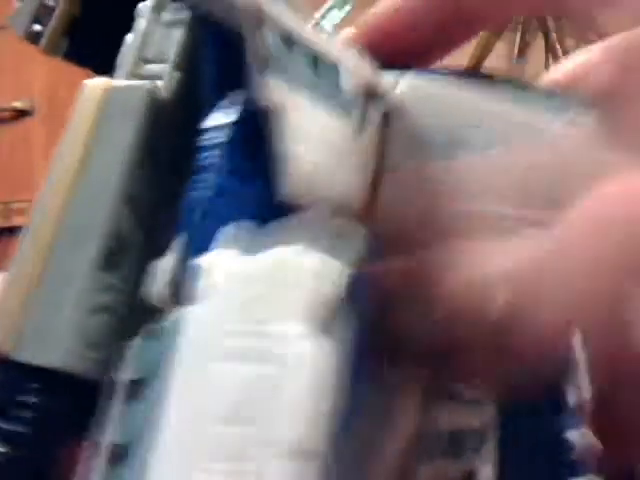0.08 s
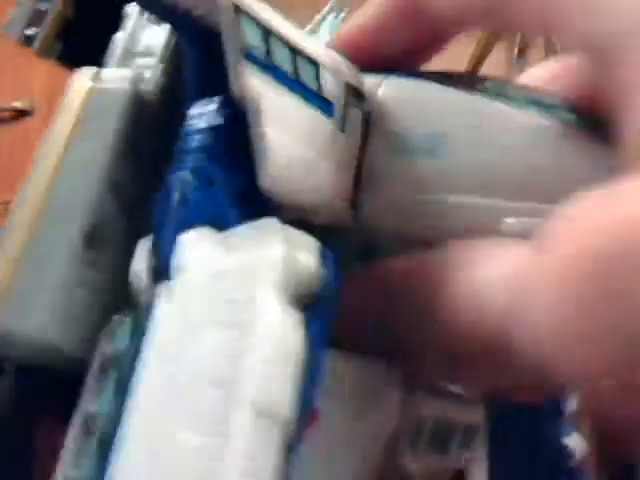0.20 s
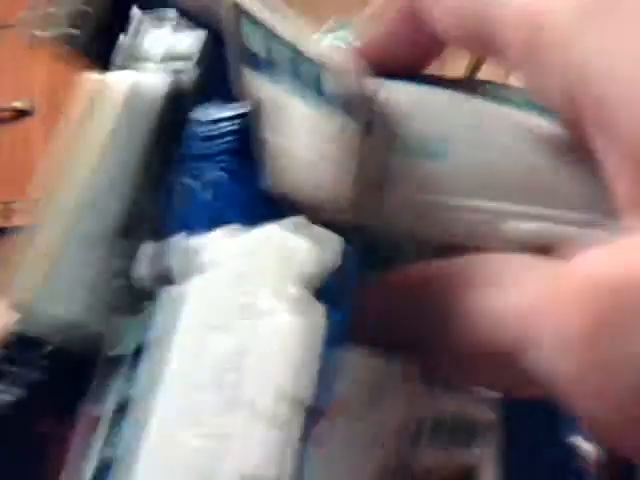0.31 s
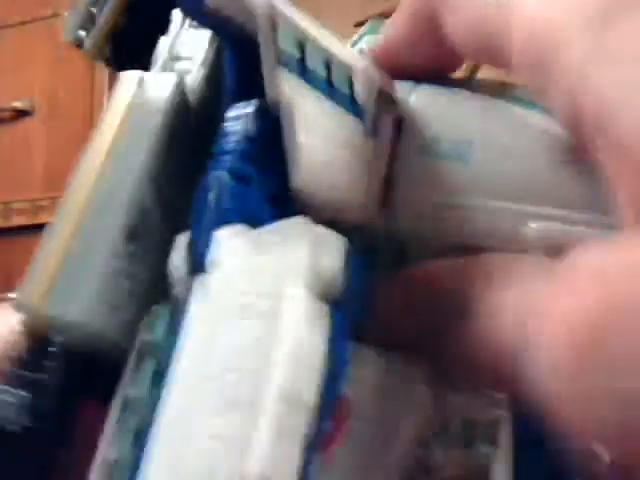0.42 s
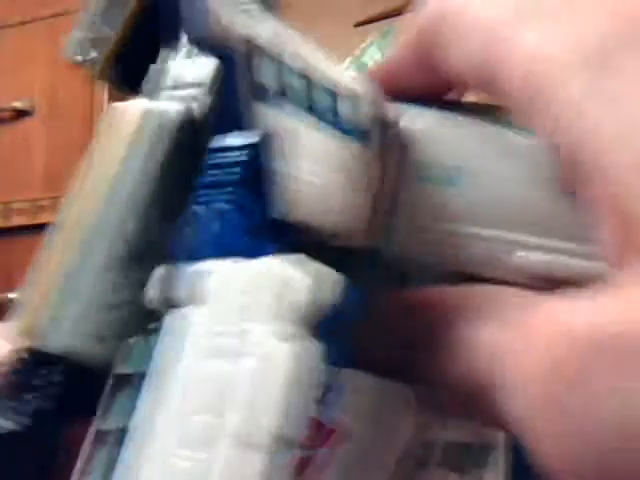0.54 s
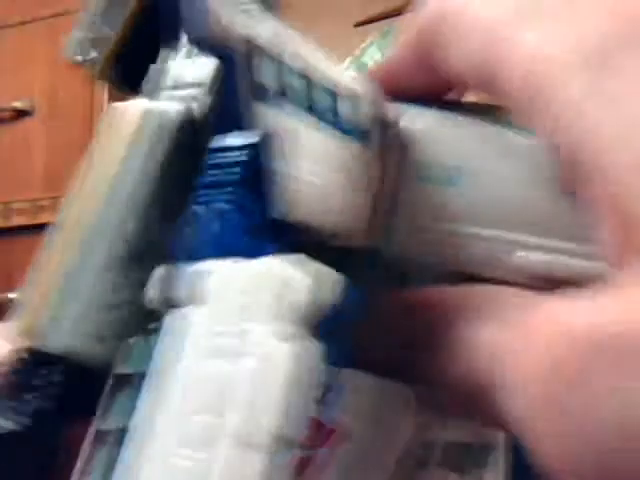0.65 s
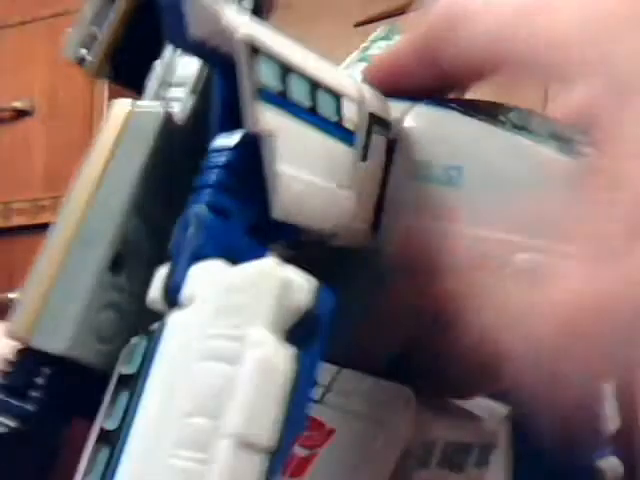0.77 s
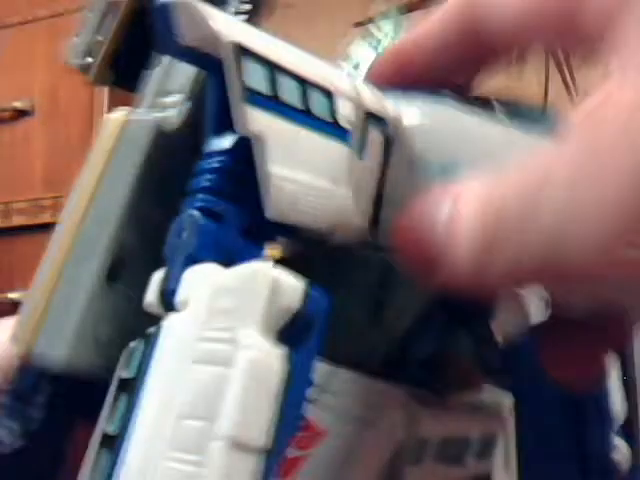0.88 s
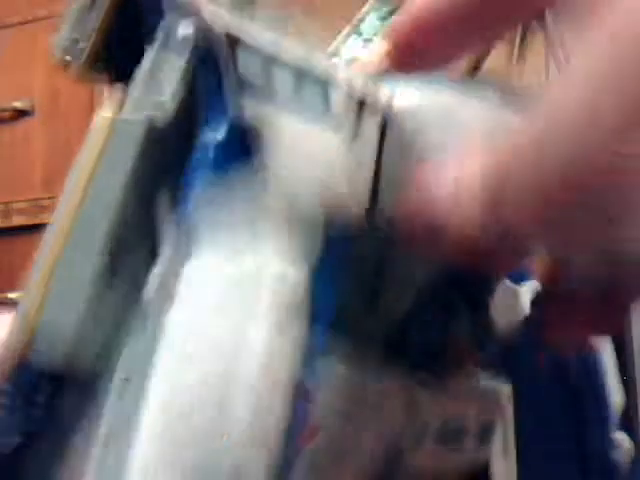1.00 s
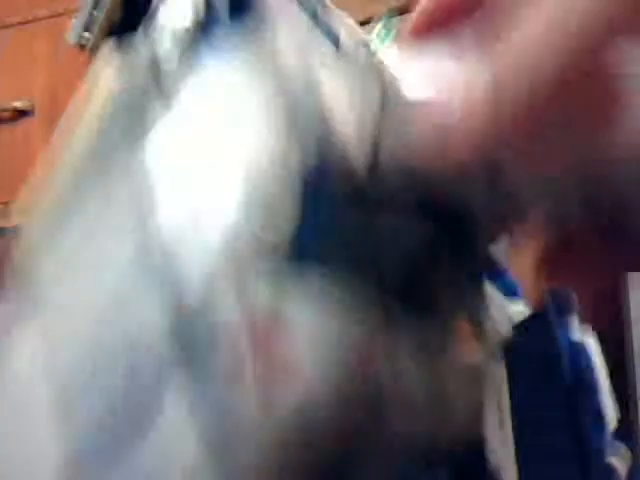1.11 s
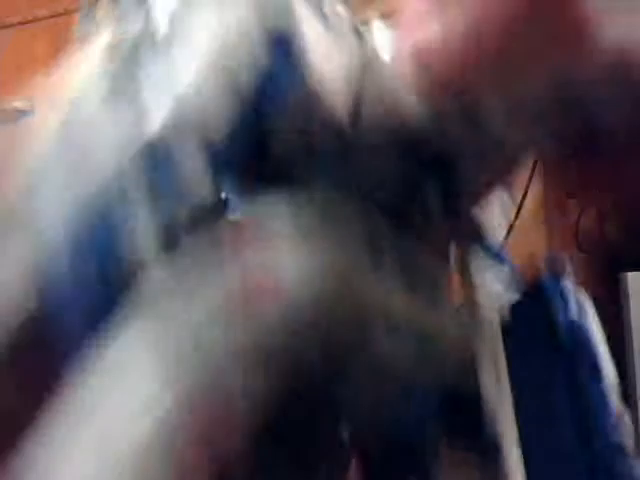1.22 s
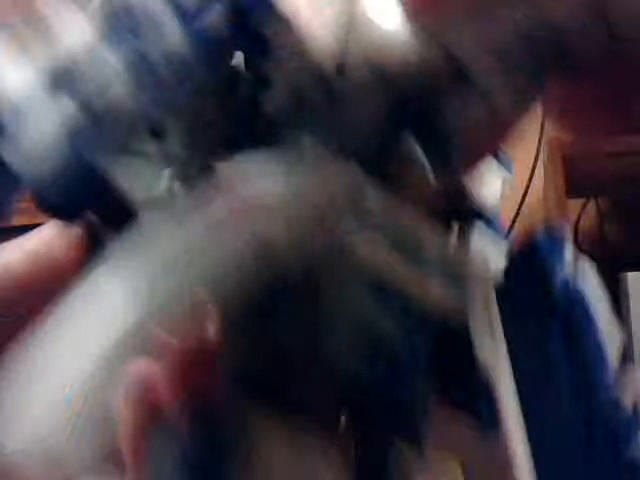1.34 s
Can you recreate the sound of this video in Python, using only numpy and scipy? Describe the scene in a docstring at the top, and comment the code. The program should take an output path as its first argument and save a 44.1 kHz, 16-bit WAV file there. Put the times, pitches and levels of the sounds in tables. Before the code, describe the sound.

Hollow hard plastic toy parts click and rub lightly, thicken into a busy clatter, then one big piece snaps home with a blunt thump; sparser clicks and tiny squeaks follow, close up in a small dry room.

```python
"""At a table in a small, dry room, heard from close by: hands work the stiff joints of a hard plastic toy.
Over a faint steady hush, hollow parts click, rub and squeak, first lightly and then in a thick clatter.
At 0.7 s one big part snaps home and thumps the table; sparser clicks, rubs and squeaks follow.
Clicks are filtered ticks with noisy ringing, rubs are grains of noise, squeaks are wavering tones,
and the thump is a set of fading tones; hollow-body modes and a short room tail answer."""
import sys
import numpy as np
from scipy import signal
from scipy.io import wavfile
from scipy.ndimage import uniform_filter1d

SR = 44100
rng = np.random.default_rng(int(sys.argv[2]) if len(sys.argv) > 2 else 0)


def pcm_store(signal):
    """Save signal as 16-bit PCM."""
    levels = np.round(np.clip(np.atleast_2d(signal), -1, 1) * 32767)
    wavfile.write(sys.argv[1], SR, levels.astype(np.int16).T)


N = 59535  # samples, 1.35 s
HZ = np.fft.rfftfreq(4096, 1 / SR)  # the frequencies at which filter gains are set


def amp(db):
    """Decibels to gain."""
    return 10 ** (np.asarray(db) / 20)


def evened(x):
    """Scales to rms 1."""
    return x / np.sqrt(np.mean(x ** 2) + 1e-20)


def read(points, hz):
    """Reads (Hz, value) points on a log-frequency axis."""
    f, value = np.transpose(points)
    return np.interp(np.log(hz + 1), np.log(f + 1), value)


def add(mix, s, sound):
    """Mixes a sound in at a time in seconds, cut off at the end of the mix."""
    part = mix[max(round(s * SR), 0):][:len(sound)]
    part += sound[:len(part)]


def colour(x, db):
    """Causal minimum-phase filter with the given gains on the HZ grid."""
    both_sides_db = np.r_[db, db[-2:0:-1]]
    log_gain = np.log(amp(np.maximum(both_sides_db, -100)))
    # the Hilbert transform of the log gain gives the phase that lets energy out earliest
    spectrum = np.exp(np.conj(signal.hilbert(log_gain)))
    taps = np.fft.ifft(spectrum).real[:len(db)]
    return signal.fftconvolve(x, taps)[:len(x)]


def contact(rattle_db, t60):
    """A sharp tick and the dense, fast-dying ring of thin walls, its energy set against the tick."""
    t = np.arange(SR // 10) / SR
    tick = t == 0
    ring = rng.choice([-1., 1.], len(t)) * amp(-60 * t / t60)
    return tick + amp(rattle_db) * ring / np.linalg.norm(ring)


RATTLE_DB, RATTLE_T60_S = 3.5, 0.025  # ring of the thin walls, against the tick
SLIP_DB, SLIP_S = 4, 0.00073  # chatter of slipping edges, against the tick; time to its peak


def slip():
    """A contact roughened by edges that chatter briefly as they slip past each other."""
    hit = contact(RATTLE_DB, RATTLE_T60_S)
    u = np.arange(len(hit)) / SR / SLIP_S
    chatter = rng.choice([-1., 1.], len(u)) * u * np.exp(-u)
    hit = hit + amp(SLIP_DB) * chatter / np.linalg.norm(chatter)
    return hit / np.linalg.norm(hit)


# Parts clicking on each other, close by. Each row: start in seconds, levels of thud, knock, clack
# and snap in dB before the common trim, ring of the struck part in Hz, its boost in dB.
PART_CLICKS = [(0.0716, -42.5, -49, -36.5, -31, 5640, 9.5), (0.167, -30, -29, -25, -43, 4200, 6),
               (0.201, -9.5, -37, -15.5, -18.5, 6620, 7), (0.2135, -28, -49, -19, -19, 5700, 1),
               (0.2212, -13.5, -39, -9, -15.5, 5730, 10), (0.229, -7, -56, -8.5, -9, 4200, 9.5),
               (0.2393, -18.5, -18, -3, -4.5, 3800, 5), (0.2436, -29.5, -2, 0, -4, 5460, 12),
               (0.2514, -22, 5.5, 5, 1, 3890, 13), (0.2774, -40, -14.5, -11, -10.5, 1950, 8),
               (0.2994, -35, -47, -16, -18, 5540, 7.5), (0.3192, -28, -49, -15, -32, 2670, 10.5),
               (0.3254, -34, -42, -24, -28, 5360, 10), (0.3365, -12, -15, -4.5, -0.5, 5530, 10),
               (0.3396, -12, -23, -7, -10.5, 5320, 13.5), (0.356, -7.5, -6, -7, -20, 5940, 1),
               (0.3632, -12.5, -12.5, 0.5, -1, 4240, 10), (0.3691, -22, -24.5, -19, -13, 5570, 1),
               (0.374, -19, -32, -7.5, -4, 6760, 11), (0.4459, -36, -60, -18, -16, 4050, 11.5),
               (0.4572, -33, -30, -13, -7.5, 4000, 6.5), (0.471, -29, -10.5, -20, -40, 2470, 8),
               (0.4748, -25, 1, 3.5, -2, 2490, 4), (0.5243, -36, -9, -1, 0, 5490, 3.5),
               (0.5333, -18.5, -22, -9.5, -24, 2700, 9), (0.542, -11.5, -26.5, -17, -30.5, 3620, 10),
               (0.5507, -27, -4.5, -3.5, -5.5, 4860, 11), (0.5542, -13.5, -17, -11.5, -33, 4980, 10),
               (0.571, -44, -8.5, -21, -33, 2440, 2.5), (0.63, -35, -39, -8, -6, 3970, 5.5),
               (0.6399, 3.5, 0.5, -14.5, -3.5, 7120, 13), (0.6423, -8, -7, -7.5, -8.5, 3440, 10),
               (0.654, -12, -2.5, -1.5, -13.5, 4130, 10), (0.657, -5, 6, -15.5, -12.5, 4100, 11),
               (0.6645, -7, -3.5, -8, -14.5, 4000, 12.5), (0.673, 4.5, -7.5, -26.5, -27.5, 4040, 6),
               (0.717, 7, 10, -4, 4, 4140, 12), (0.7218, 7.5, 14.5, -8, -39, 1960, 9.5),
               (0.728, 4, -17.5, -10, -4, 4180, 11), (0.7447, -6, -24, -3, -8.5, 1594, 7.5),
               (0.7552, -7, -24.5, -26.5, -25, 6130, 13.5), (0.773, -14.5, -5.5, -18.5, -30, 2550, 12.5),
               (0.7953, 7, 6.5, -11, -21.5, 4030, 24), (0.8036, -3, 6.5, -10, -21, 3860, 26.5),
               (0.8563, -47, -40, -26.5, -27.5, 2620, 18), (0.8665, -46, -48.5, -19.5, -29, 2320, 0.5),
               (0.8979, -33.5, -14.5, -29.5, -25, 1770, 18.5), (0.9321, -20, -18, -29, -30, 4360, 17.5),
               (0.964, -43, -21, -32, -28, 4540, 19), (0.979, -28, -25.5, -11, -7, 2625, 15),
               (1.0038, -16.5, -10.5, -5.5, -10.5, 2510, 5.5), (1.0105, -28, -15.5, -21, -45, 1280, 12),
               (1.0254, -21, -18, -15, -7, 6270, 6.5), (1.0374, -30, -20, -13, -17, 2530, 10.5),
               (1.046, -22.5, -38, -32, -41.5, 2460, 2.5), (1.079, -41, -55.5, -31, -25.5, 5600, 11.5),
               (1.1335, -40.5, -41.5, -40.5, -35.5, 5010, 19), (1.177, -40.5, -34, -37.5, -41, 1890, 10.5),
               (1.2284, -42, -36.5, -17, -28, 2670, 8), (1.2338, -45, -41, -26, -28.5, 4090, 20),
               (1.275, -54.5, -42, -21.5, -20, 3400, 6), (1.281, -19.5, -19.5, -2.5, -2, 5450, 11.5),
               (1.3213, -49, -41, -42, -8.5, 5900, 6.5)]
# Centres of thud, knock, clack and snap. One row: four frequencies in Hz.
CLICK_COLOURS = [250, 900, 2900, 5700]
CLICK_TRIM_DB, PART_WIDTH_HZ = -1.5, 354  # common trim; half width of the part's ring
LOWEST_HZ = 120  # light parts push little air below this


def clicks():
    """Each contact has its own weight and brightness and rings the part that is struck."""
    out = np.zeros(N)
    bass_loss = -10 * np.log10(1 + (LOWEST_HZ / (HZ + 1)) ** 2)
    for s, *levels, part_hz, ring_db in PART_CLICKS:
        brightness = read(list(zip(CLICK_COLOURS, levels)), HZ)
        ring = ring_db / (1 + ((HZ - part_hz) / PART_WIDTH_HZ) ** 2)
        add(out, s, colour(slip(), brightness + ring + bass_loss + CLICK_TRIM_DB))
    return out


# The big part snapping home. Each row: frequency in Hz, gain in dB.
LATCH_COLOUR = [(80, 7.5), (250, 9), (550, 3), (900, 19.5), (1800, 11.5), (3000, 9.5), (4500, -1.5),
                (7000, -12)]
LATCH_S = 0.7002  # start in seconds
LATCH_RATTLE_DB, LATCH_T60_S = -2, 0.041  # its wall ring, against the tick


def latch():
    """The big part snaps home with one blunt, strong pulse and a dense ring."""
    out = np.zeros(N)
    snap = contact(LATCH_RATTLE_DB, LATCH_T60_S)
    add(out, LATCH_S, colour(snap, read(LATCH_COLOUR, HZ)))
    return out


# What the snap sets swinging in toy and table. Each row: delay after the snap in seconds,
# frequency in Hz, level in dB before the slow rise, t60 in seconds.
THUMP_MODES = [(.002, 818, -17, 0.039), (.004, 984, -33, .08), (.003, 412, -32, 0.061),
               (.006, 287.7, -30.5, .16), (.012, 205, -26.5, .14), (.02, 131.7, -25, .14)]
THUMP_RISE_S = 0.006  # time constant


def thump():
    """Toy and table swing on after the snap, each mode building up and fading; the three lowest last longest."""
    out, t = np.zeros(N), np.arange(SR // 2) / SR
    rise = 1 - np.exp(-t / THUMP_RISE_S)
    for delay, hz, db, t60 in THUMP_MODES:
        fade = amp(db - 60 * t / t60)
        add(out, LATCH_S + delay, rise * fade * np.sin(2 * np.pi * hz * t))
    return out


# Parts sliding on each other. Each row: centre in seconds, time from the centre to 1/e in seconds,
# levels of rumble, scrape and fizz in dB before the body rings, scrape centre in Hz.
SLIDES = [(0.171, 0.016, -62.5, -62, -71.5, 900), (0.227, 0.019, -51.5, -56.5, -49.5, 1840),
          (0.276, 0.014, -55, -57.5, -52, 1300), (0.358, .016, -44.5, -42.5, -44.5, 1350),
          (0.427, 0.016, -61.5, -87, -81, 890), (0.502, 0.016, -66.5, -60.5, -64, 1520),
          (0.544, 0.017, -56.5, -51, -47.5, 1160), (.661, 0.019, -44.5, -42, -49.5, 596),
          (0.759, 0.024, -45.5, -44, -61, 770), (0.814, 0.013, -46.5, -42, -70, 920),
          (0.927, 0.028, -70.5, -63, -64.5, 920), (1.026, 0.033, -66, -49.5, -60.5, 1600),
          (1.238, 0.014, -69.5, -60.5, -59, 2310), (1.266, 0.016, -81.5, -83, -54.5, 2300),
          (1.313, 0.019, -76, -75, -45, 2280)]
# Fixed centres of the other two bands. One row: rumble in Hz, fizz in Hz.
RUMBLE_AND_FIZZ = [173, 4450]
# Band widths, centre to 4.3 dB down. One row: rumble, scrape and fizz in octaves.
RUB_WIDTHS = [0.73, 0.59, .45]
GRAINS_PER_S, GRAIN_SPREAD_DB = 1200, 4  # average rate; scale of the random excess in level


def rubs():
    """Sliding parts: swells of tiny slips, heard as rumble, scrape and fizz."""
    out, t = np.zeros(N), np.arange(-SR // 8, SR // 8) / SR
    rumble_hz, fizz_hz = RUMBLE_AND_FIZZ
    for s, half, *levels, scrape_hz in SLIDES:
        swell = np.exp(-(t / half) ** 2)
        for db, hz, octaves in zip(levels, [rumble_hz, scrape_hz, fizz_hz], RUB_WIDTHS):
            size_db = GRAIN_SPREAD_DB * np.minimum(rng.exponential(1, len(t)), 4)
            sizes = rng.choice([-1, 1], len(t)) * amp(size_db)
            slips = sizes * (rng.random(len(t)) < GRAINS_PER_S / SR)
            band_db = -4.3 * (np.log2((HZ + 1) / hz) / octaves) ** 2
            grain = evened(colour(slips, np.maximum(band_db, -60)))
            add(out, s + t[0], amp(db) * swell * grain)
    return out


# Tight joints squeaking and groaning. Each row: centre in seconds, spread (standard deviation of
# the swell) in seconds, pitch in Hz, peak level in dB before the room and the overall tone.
JOINT_SQUEAKS = [(0.181, 0.013, 420, -55), (0.212, 0.011, 172, -40.5), (.285, 0.0016, 5630, -36),
                 (0.351, 0.0083, 395, -41.5), (0.354, 0.016, 165, -45), (.435, 0.016, 168, -53),
                 (0.441, 0.0019, 4100, -48.5), (0.649, 0.0057, 410, -31), (.868, 0.0018, 2440, -51),
                 (0.902, 0.0024, 1758, -43.5), (0.946, 0.0032, 850, -48), (.955, 0.0027, 833, -47),
                 (.9895, 0.0022, 3860, -44.5), (1.055, 0.012, 168, -52.5), (1.2303, 0.0012, 4020, -42),
                 (1.2355, 0.0013, 4090, -38.5), (1.3094, .002, 3380, -42), (1.3237, 0.0014, 3360, -37.5)]
SQUEAK_JITTER = 0.029  # rms pitch deviation, as a fraction


def squeaks():
    """A joint sticks and slips for some milliseconds at a slightly unsteady pitch."""
    out, t = np.zeros(N), np.arange(N) / SR
    for s, spread, hz, db in JOINT_SQUEAKS:
        wander = evened(uniform_filter1d(rng.standard_normal(N), size=30))
        waver = 1 + SQUEAK_JITTER * wander
        swell = np.exp(-((t - s) / spread) ** 2 / 2)
        phase = 2 * np.pi * np.cumsum(hz * waver) / SR
        out += amp(db) * swell * np.sin(phase)
    return out


# The hollow body, rung by clicks, snap and rubs. Each row: mode in Hz, gain at resonance in dB.
BODY_MODES = [(180, 2), (400, 5), (575, -3.5), (765, -2.5), (860, -0.5), (1030, -3), (1200, -14),
              (1320, -2.5), (1860, -7), (2335, -5.5), (2460, -2.5), (3220, -10.5), (3700, -11),
              (3920, -8.5), (4250, -3.5), (5230, -9), (5650, -6.5)]
BODY_T60_S, BODY_DAMPING = 0.098, 0.22  # ring time at 1 kHz; higher modes die sooner by this power


def body(x):
    """The hollow toy adds its decaying modes to the contacts that ring it."""
    t = np.arange(SR // 4) / SR
    ring = np.zeros(len(t))
    for hz, db in BODY_MODES:
        rate = np.log(1000) / BODY_T60_S * (hz / 1000) ** BODY_DAMPING
        strength = amp(db) * 2 * rate / SR  # evens out the gain of long and short rings
        ring += strength * np.exp(-rate * t) * np.sin(2 * np.pi * hz * t)
    return x + signal.fftconvolve(x, ring)[:N]


# How long the small room rings. Each row: frequency in Hz, t60 in seconds.
ROOM_RING = [(120, 0.21), (320, 0.3), (900, 0.098), (2200, 0.11), (6000, 0.07)]
ROOM_DB, ROOM_DELAY_S = -14, 0.0043  # tail energy against the direct sound; its delay


def room(x):
    """A short diffuse tail of fading noise that lasts longest around 320 Hz."""
    hz, t, z = signal.stft(rng.standard_normal(SR // 2), SR, nperseg=256)
    fade = amp(-60 * t / read(ROOM_RING, hz)[:, None])
    tail = signal.istft(z * fade, SR, nperseg=256)[1]
    out = np.zeros(N)
    add(out, ROOM_DELAY_S, signal.fftconvolve(x, tail / np.linalg.norm(tail)))
    return out


# Spectrum of the room's background. Each row: frequency in Hz, relative density in dB per Hz.
HUSH_COLOUR = [(18, -65), (30, -12.5), (120, 6.5), (273, 5.5), (337, 0), (699, 3.5), (786, 2), (1140, -8.5),
               (1410, -11.5), (1590, -14.5), (2480, -16), (8230, -23.5), (10700, -70), (18100, -120)]
HUSH_DB = -68  # rms level before the overall tone


def hush():
    """The steady background of the room, as coloured noise."""
    noise = rng.standard_normal(N + len(HZ))
    settled = colour(noise, read(HUSH_COLOUR, HZ))[-N:]  # skips the filter's start-up
    return amp(HUSH_DB) * evened(settled)


def scene():
    """The toy in its room."""
    toy = body(clicks() + latch() + rubs()) + squeaks() + thump()
    return (toy + amp(ROOM_DB) * room(toy) + hush())[None]


# Overall tone of the sound. Each row: frequency in Hz, gain in dB.
OVERALL_TONE = [(30, -17), (80, -12), (130, -2.5), (1000, 0), (6300, -0.5), (7200, -15.5), (8000, -24.5),
                (8800, -44.5), (15000, -47)]
EDGE_HZ = 15800  # upper band limit


def record(dry):
    """Overall tone: little bass, a steep fall above 6.3 kHz, a very faint remainder up to the band limit."""
    toned = colour(dry[0], read(OVERALL_TONE, HZ))
    low_pass = signal.firwin(511, EDGE_HZ, window=("kaiser", 9), fs=SR)
    return signal.fftconvolve(toned, low_pass, "same")[None]


dry = scene()
out = record(dry)
pcm_store(out)
```